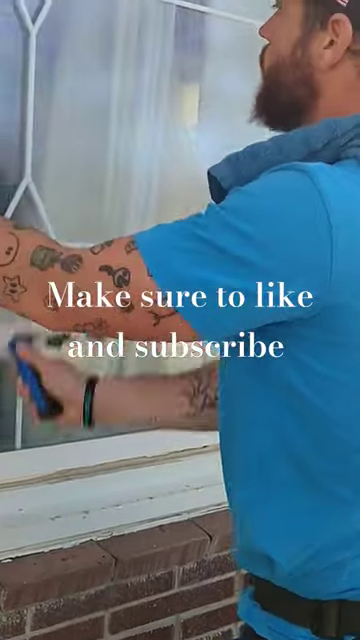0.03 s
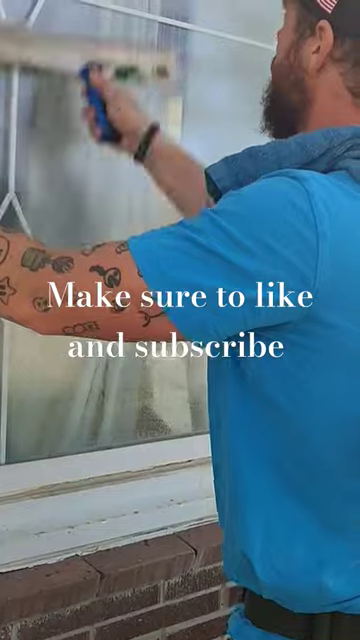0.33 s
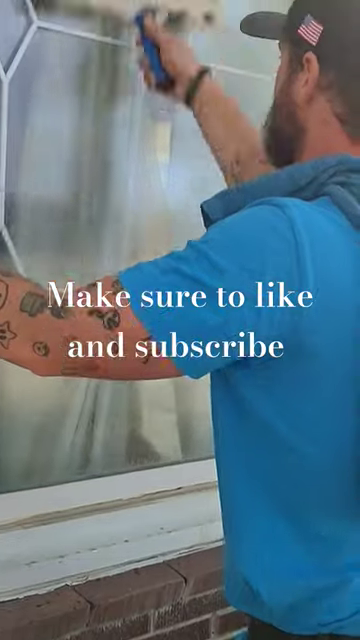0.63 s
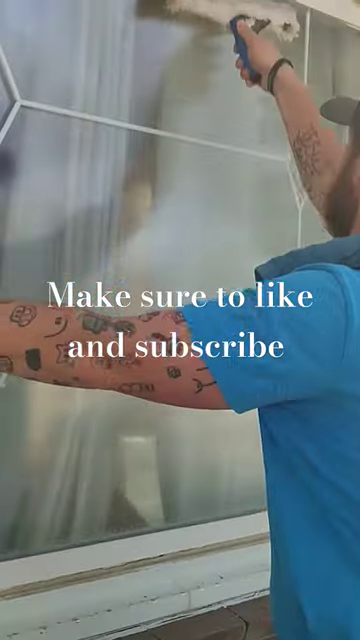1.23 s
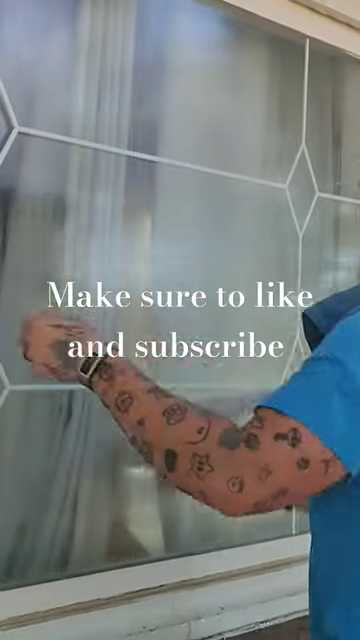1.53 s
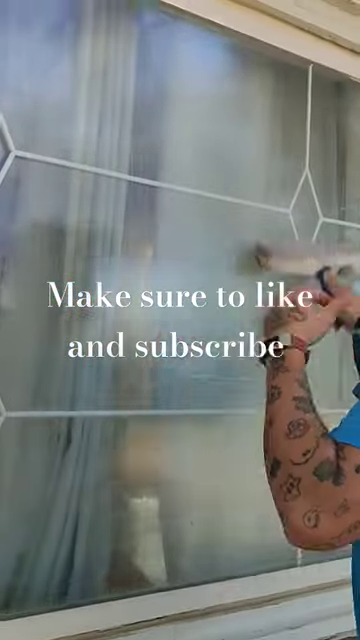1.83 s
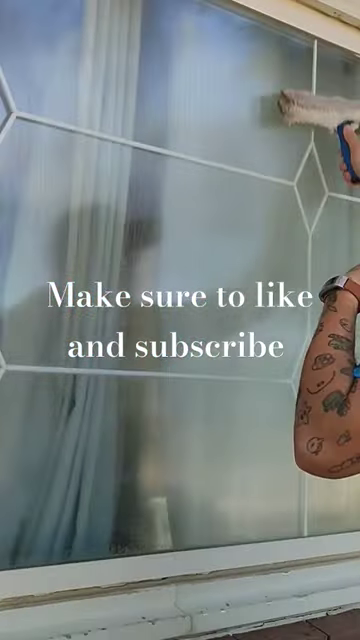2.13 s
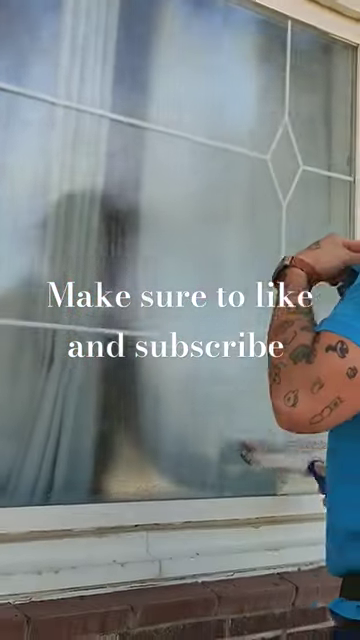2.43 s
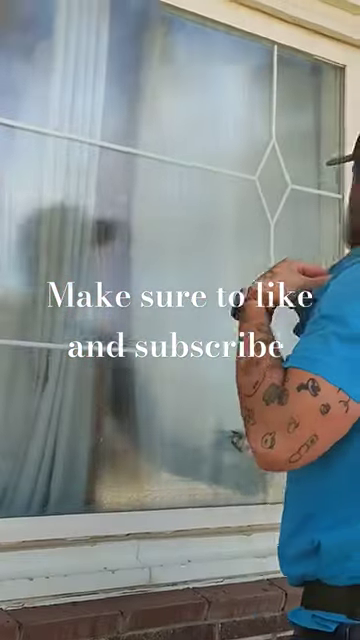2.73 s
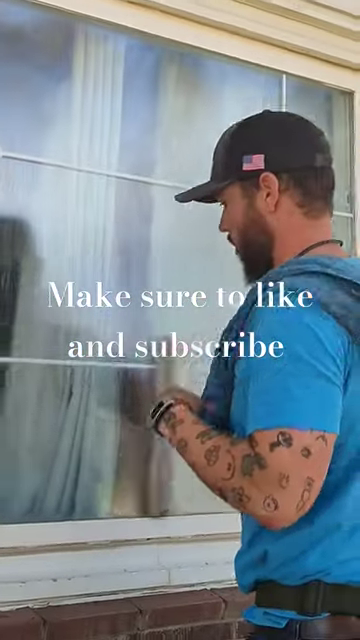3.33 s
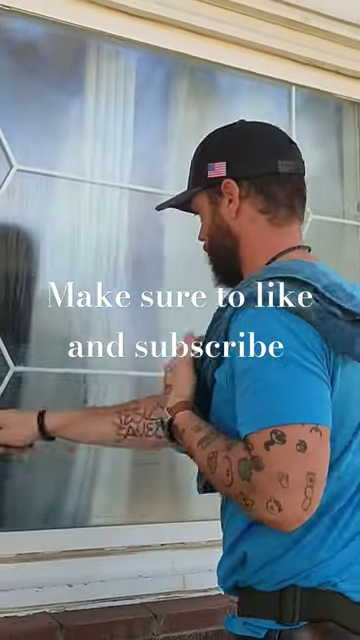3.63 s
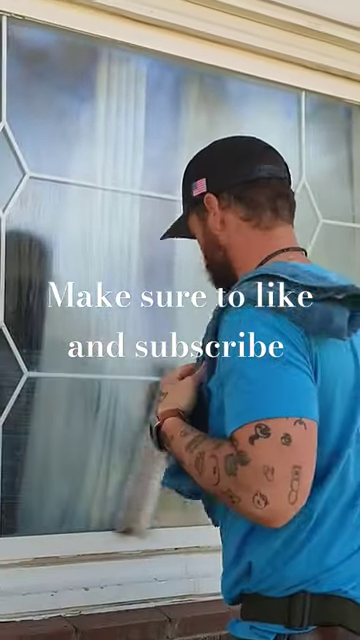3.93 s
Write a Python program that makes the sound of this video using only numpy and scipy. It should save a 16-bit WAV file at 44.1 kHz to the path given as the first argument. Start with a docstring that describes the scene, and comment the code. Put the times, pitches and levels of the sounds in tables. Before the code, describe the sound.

A wet applicator rubs a large window close by, a faint hiss at first, then two clusters of short scuffs and tool ticks. Light wind rumbles unevenly on the microphone over soft outdoor hiss.

```python
"""A wet sleeve hisses over a large window pane outdoors, a step or two away, in a light buffeting wind.
The hiss is the applicator's dense friction on the glass, with a brief squeak as the stroke turns.
Cloth fibres catch in short scuffs, the tool ticks and knocks, and one soft bump makes the pane boom.
Wind rumbles and flutters on the two microphone ports in turn, over soft outdoor hiss and far traffic."""
import sys
import numpy as np
from scipy import signal
from scipy.fft import rfft, irfft
from scipy.io import wavfile
from scipy.ndimage import uniform_filter1d

SR = 44100
rng = np.random.default_rng(int(sys.argv[2]) if len(sys.argv) > 2 else 0)


def persist_wave(psi):
    """Save psi, clipped to +-1, as 16-bit WAV."""
    counts = np.round(np.clip(psi, -1, 1) * 32767).astype(np.int16)
    wavfile.write(sys.argv[1], SR, np.atleast_2d(counts).T)


N = 176400

# The ringing body of the tool. Each row: pitch in Hz, relative level in dB, t60 in seconds.
TOOL_MODES = [(636, -24, 0.021), (1035, 3, 0.011), (1810, -4, 0.034), (2110, 9.5, 0.012),
              (2310, -12, 0.046), (2460, 2, 0.0054), (3070, 1, 0.011)]


def sleeve():
    """The wet sleeve hisses in dense tiny slips on the glass, with a thin singing band that sags."""
    # The strokes. Each row: time in seconds, hiss level in dB.
    strokes = [(0, -64.5), (1.25, -71.5), (1.36, -62), (1.45, -70), (1.7, -61.5), (1.83, -55),
               (2.02, -55.5), (2.11, -53.5), (2.23, -59), (2.36, -53), (2.47, -64.5), (2.6, -70),
               (3.3, -71.5), (3.6, -65), (4, -73)]
    # The tone of wet sleeve on glass. Each row: frequency in Hz, relative level in dB.
    wet_tone = [(150, -15), (400, 0), (800, -4.5), (1200, -4.5), (1800, -1.5), (2600, -1), (3000, -4),
                (3300, -7), (3900, -3.5), (4400, -2), (5200, -2.5), (6200, -5.5), (7200, -12), (9000, -13),
                (15000, -21)]
    # The swell of the singing band. Each row: time in seconds, level in dB.
    singing = [(1.5, -92), (1.68, -70), (1.8, -60), (1.92, -63.5), (2.05, -68), (2.2, -63), (2.33, -64),
               (2.45, -82)]
    slips = grains(per_s=7100, spread_db=2.5)
    hiss = unit(colour(slips, wet_tone)) * amp(curve(strokes))
    start_hz, sag_hz_per_s = 3025, 420
    hz = start_hz - sag_hz_per_s * (clock() - singing[0][0])
    sing = unit(resonate(rng.standard_normal((2, N)), hz, width_hz=490)) * amp(curve(singing))
    return (hiss + sing) * pan(-5)


def squeaks():
    """As the stroke turns, the sleeve sticks and slips on the glass, sounding a few narrow resonances."""
    # Each row: peak time, rise and fall in seconds, level in dB, left over right in dB.
    catches = [(1.958, 0.017, 0.021, -56, -19.5), (1.982, 0.0038, .002, -49, -18)]
    # The squeak's resonances. Each row: centre in Hz, width in Hz, relative level in dB.
    resonances = [(950, 200, -15), (2080, 220, 4), (2240, 220, 5), (2570, 400, 5), (3580, 580, -6)]
    slips = rng.standard_normal((2, N))
    tone = sum(amp(db) * unit(resonate(slips, hz, width)) for hz, width, db in resonances)
    effort = sum(swell(peak, rise, fall) * amp(db) * pan(pan_db)
                 for peak, rise, fall, db, pan_db in catches)
    return steadied(tone, size=200) * effort


def scuffs():
    """Cloth fibres catch and let go in short, bright bursts."""
    # Each row: peak time, rise and fall in seconds, level in dB, treble tilt in dB per octave,
    # left over right in dB.
    brushes = [(1.805, 0.03, 0.057, -56.5, 9, 4), (1.972, 0.039, 0.019, -50, 1, 3),
               (2.298, 0.035, 0.026, -52.5, 0.5, -2), (2.372, 0.044, 0.039, -48.5, -2, -1),
               (3.092, 0.0057, 0.032, -62, -8, -11), (3.645, .025, 0.024, -57, 5, 0),
               (3.695, 0.024, 0.024, -42, -0.5, 0), (3.752, 0.013, 0.0072, -51, 10, -1),
               (3.775, 0.023, 0.03, -44.5, -2, -4), (3.935, 0.024, 0.027, -56.5, -1.5, -3),
               (3.992, 0.013, .02, -58, 3, -4)]
    # The tone of the cloth. Each row: frequency in Hz, relative level in dB.
    cloth_tone = [(200, -39), (700, -7), (1100, -6), (1700, -0.5), (2600, -1.5), (4300, 0.5), (5500, 2),
                  (6400, 3), (7400, 1), (9500, 1), (11200, -2), (12100, 0), (13500, -0.5), (14700, -1),
                  (15500, -13)]
    slips = steadied(grains(per_s=3600, spread_db=2), size=500)
    out = np.zeros((2, N))
    for peak, rise, fall, db, tilt_db, pan_db in brushes:
        rustle = unit(colour(slips, tilted(cloth_tone, tilt_db)))
        out += rustle * swell(peak, rise, fall) * amp(db) * pan(pan_db)
    return out


def ticks():
    """Ticks of the tool and snaps of cloth: brief cracks that set the tool ringing."""
    # Each row: start in seconds, level in dB, decay in seconds, ring relative to the crack in dB,
    # treble tilt in dB per octave, left over right in dB.
    snaps = [(1.784, -44, .001, -25, 11, 16), (1.7838, -44, 0.0016, 0, -4, -12.5),
             (1.860, -34.5, 0.0017, -7, 8, -3), (1.977, -51, 0.0016, -13, 4, -8),
             (1.9813, -39.5, .0018, -21, 9, -1), (2.308, -38, 0.0011, -19, 13, 1),
             (2.357, -47, .0015, -14, 14, -2), (2.829, -52, 0.0068, -14, 5, -5),
             (2.880, -56, 0.0024, 0, 2, -6), (3.0869, -41.5, 0.001, -28, 2, -6),
             (3.607, -51, 0.0021, -3, -6, 1), (3.641, -47.5, 0.0017, -8, 2, -3),
             (3.6782, -33.5, 0.0017, -23, 12, -5), (3.6857, -40, 0.0013, -25, 8.5, -21),
             (3.698, -37.5, 0.0028, -13, 7.5, -13), (3.7427, -39, 0.0023, -10, 3, -1),
             (3.7485, -42, .002, -11, 16, -3), (3.766, -39, 0.0014, -13, -2.5, 6),
             (3.936, -60, .0015, -1, 1, -3)]
    # The tone of a crack. Each row: frequency in Hz, relative level in dB.
    crack_tone = [(200, -37), (900, 3.5), (1300, 7), (1800, 8.5), (2700, 4), (4500, -3.5), (6400, 0.5),
                  (9000, -20), (15000, -16)]
    crack, drive = np.zeros((2, 2, N))
    crack_noise, drive_noise = rng.standard_normal((2, 2, N))
    t = np.arange(2048) / SR
    hz = np.fft.rfftfreq(len(t), 1 / SR)
    for start, db, decay, ring_db, tilt_db, pan_db in snaps:
        span = slice(round(start * SR), round(start * SR) + len(t))
        blow = np.exp(-t / decay) * amp(db) * pan(pan_db)
        grit = irfft(rfft(crack_noise[:, span]) * amp(read(tilted(crack_tone, tilt_db), hz)))
        crack[:, span] += blow * steadied(grit, size=40)
        drive[:, span] += blow * amp(ring_db) * drive_noise[:, span]
    return crack + tool_ring(drive)


def tool_ring(drive):
    """The body of the tool answers a blow with short resonances."""
    t = np.arange(3000) / SR
    ring = sum(amp(db - 60 * t / t60) * np.sin(2 * np.pi * hz * t) for hz, db, t60 in TOOL_MODES)
    return signal.oaconvolve(drive, ring[None] / np.linalg.norm(ring))[:, :N]


def knocks():
    """A hard contact rings all the tool's modes at once, as a scrape ends and as it changes hands."""
    # Each row: start in seconds, level in dB, tilt about 2 kHz in dB per octave, left over right in dB.
    contacts = [(1.9782, -48.5, 0, -15.5), (3.0866, -71, -18, -3)]
    out = np.zeros((2, N))
    for start, db, tilt_db, pan_db in contacts:
        t = np.maximum(clock() - start, 0)
        for hz, mode_db, t60 in TOOL_MODES:
            struck_db = db + mode_db + tilt_db * np.log2(hz / 2000)
            out += pan(pan_db) * amp(struck_db - 60 * t / t60) * np.sin(2 * np.pi * hz * t)
    return out


def pane(rise_s=0.0043):
    """A soft bump makes the whole sheet of glass boom, alike at both ports."""
    # The tool meets the pane at the top of a stroke. Each row: start in seconds, level in dB.
    bumps = [(1.383, -34.5)]
    # The modes of the pane. Each row: pitch in Hz, relative level in dB, t60 in seconds.
    glass_modes = [(45.6, -3.5, 0.66), (65.25, 0.5, 1), (119, -13, 0.16), (334, -21.5, 0.33),
                   (434, -18, 0.14), (507, -34, 0.072)]
    out = np.zeros(N)
    for start, db in bumps:
        t = np.maximum(clock() - start, 0)
        boom = sum(amp(level - 60 * t / t60) * np.sin(2 * np.pi * hz * t)
                   for hz, level, t60 in glass_modes)
        out += amp(db) * (1 - np.exp(-t / rise_s)) * boom
    return out


def wall(x, level_db=-11, t60_s=0.03):
    """The house wall and the ground throw back a short scatter of echoes."""
    t = np.arange(SR // 4) / SR
    arrivals = (rng.random((2, len(t))) < 0.1) * (t > 0.003)
    echoes = rng.standard_normal((2, len(t))) * arrivals * amp(-60 * t / t60_s)
    return amp(level_db) * signal.oaconvolve(x, echoes / np.linalg.norm(echoes[0]), axes=1)[:, :N]


def wind():
    """Each microphone port rumbles on its own in uneven puffs, and brighter as the wind rises."""
    # The wind at each port. Each row: time in seconds, strength in dB.
    left_wind = [(0.0, -57), (0.36, -51), (0.45, -48.5), (0.53, -49.5), (0.6, -48), (0.79, -55),
                 (0.86, -46), (1.04, -48.5), (1.12, -45), (1.36, -46.5), (1.52, -42), (1.58, -33.5),
                 (1.67, -38.5), (1.71, -35.5), (1.75, -37), (1.85, -37), (1.93, -52), (2.02, -57.5),
                 (2.2, -41.5), (2.34, -44.5), (2.5, -43), (2.6, -48), (2.76, -45), (2.89, -44.5),
                 (3.08, -45), (3.24, -50), (3.47, -39.5), (3.72, -44), (3.84, -36.5), (3.96, -40.5),
                 (4.0, -43)]
    right_wind = [(0, -66), (.1, -52), (1.32, -59.5), (1.6, -46), (1.84, -51), (1.93, -40.5), (2.02, -52),
                  (2.2, -38), (2.26, -43), (2.33, -33), (2.41, -35.5), (2.52, -35), (2.6, -42), (2.74, -38),
                  (2.81, -43.5), (2.94, -40), (3.04, -44), (3.11, -41.5), (3.18, -52.5), (3.39, -44.5),
                  (3.46, -38.5), (3.6, -37), (3.66, -41), (3.74, -44), (3.8, -36.5), (3.94, -31.5),
                  (4, -38)]
    # The tones of slow rumble and faster turbulence. Each row: frequency in Hz, relative level in dB.
    rumble_tone = [(10, -1.5), (22, -5.5), (40, 6), (65, 0), (95, -4.5), (140, -18.5), (250, -55),
                   (600, -95)]
    turbulence_tone = [(50, -14.5), (110, 2.5), (165, 2), (230, -7.5), (290, -17), (380, -19), (600, -34),
                       (1500, -47)]
    gust_db, breeze_db, growth = 2, -40.5, 1.92
    wind_db = np.array([curve(port) + gust_db * wander(hz=20.4) for port in (left_wind, right_wind)])
    turbulence_db = -51.5 + growth * (wind_db - breeze_db)
    slow, fast = rng.standard_normal((2, 2, N))
    rumble = steadied(colour(slow, rumble_tone), size=2600) * amp(wind_db + 0.5)
    turbulence = steadied(colour(fast, turbulence_tone), size=2000) * amp(turbulence_db)
    return rumble + turbulence


def eddies(overtone_db=-15):
    """Passing eddies shake a port for a few uneven, lopsided cycles."""
    # Each row: centre and length in seconds, level in dB, flutter in Hz, side from 0 left to 1 right.
    puffs = [(0.449, .07, -46.5, 114.8, .05), (0.589, 0.044, -40.5, 104.6, 0.05),
             (0.691, 0.034, -43, 71.5, .05), (0.869, 0.041, -45.5, 86, 0.055), (.925, .05, -45, 94.7, .05),
             (1.12, 0.044, -35.5, 97, 0.036), (1.296, 0.04, -42, 138, 0.045),
             (1.478, 0.052, -37.5, 101.6, 0.091), (1.56, 0.023, -36, 146, .03),
             (1.579, 0.088, -28.5, 71.7, .05), (1.598, .03, -38.5, 164, .04),
             (1.637, .08, -30.5, 69.9, .05), (1.663, .035, -35.5, 182, 0.036),
             (1.737, 0.027, -24.5, 94.7, .03), (1.83, 0.11, -41.5, 126, 0.14),
             (2.174, 0.026, -39, 200, 0.99), (2.303, 0.041, -28.5, 60, 0.98),
             (2.342, 0.023, -29.5, 141, .97), (2.372, 0.049, -25, 111.5, 0.98),
             (2.405, .025, -40.5, 169, 0.8), (2.431, 0.032, -25.5, 138.4, 1),
             (2.485, 0.051, -20, 126, 0.94), (2.505, .05, -35.5, 51.5, .1),
             (2.633, 0.041, -33.5, 98.7, 0.91), (2.723, 0.062, -43, 94.8, .9),
             (3.25, 0.032, -34, 57.6, 0.95), (3.454, 0.041, -41, 103, 0.92),
             (3.582, .05, -40.5, 107.3, 0.75), (3.633, 0.046, -39.5, 60, 0.044),
             (3.778, 0.0215, -20, 135, 1), (3.856, .06, -23.5, 151.6, 1), (3.898, 0.035, -31.5, 131, 1),
             (3.952, 0.058, -28.5, 100, 1)]
    waver = np.exp(0.2 * wander(hz=127))
    out = np.zeros((2, N))
    for centre, length, db, hz, side in puffs:
        passage = (clock() - centre) / length
        on = abs(passage) < 0.5
        phase = 2 * np.pi * (np.cumsum(hz * waver[on]) / SR + rng.random())
        flutter = np.cos(phase) + amp(overtone_db) * np.cos(2 * phase)
        envelope = np.sqrt(2) * amp(db) * np.cos(np.pi * passage[on]) ** 1.62
        ports = np.array([[np.cos(side * np.pi / 2)], [np.sin(side * np.pi / 2)]])
        out[:, on] += ports * envelope * flutter
    return out


def air(level_db=-58, coder_mottle_db=1.45):
    """Soft, steady outdoor hiss; a faint digital-compression mottle lies over it."""
    # The tone of the hiss. Each row: frequency in Hz, relative level in dB.
    air_tone = [(20, 13.8), (120, 11.96), (200, 7), (280, 3.7), (400, 4.3), (620, 1), (850, 2), (1150, -1),
                (2500, -1.5), (4500, -3), (7000, -3), (9500, -6), (15000, -9)]
    # How alike left and right are. Each row: frequency in Hz, likeness from 0 to 1.
    likeness = [(100, 0.39), (300, 1), (800, 0.13), (1400, 0.011), (15000, 0.016)]
    hz = np.fft.rfftfreq(1024, 1 / SR)
    noise = rng.standard_normal((5, N // 256 + 5, len(hz)))
    left, apart = noise[0] + 1j * noise[1], noise[2] + 1j * noise[3]
    same = read(likeness, hz)
    right = same * left + np.sqrt(1 - same ** 2) * apart
    slow_noise = uniform_filter1d(noise[4], size=12, axis=0)
    coder_mottle = unit(uniform_filter1d(slow_noise, size=40, axis=1))
    spectra = np.array([left, right]) * amp(read(air_tone, hz) + coder_mottle_db * coder_mottle)
    hiss = signal.istft(spectra.transpose(0, 2, 1), nperseg=1024, noverlap=768)[1][:, :N]
    return unit(hiss) * amp(level_db) * pan(-2)


def traffic(spread=0.86, fade_db_per_s=0.5):
    """Far tyres and engines blur into two soft bands of noise that slowly fade."""
    # Each row: centre in Hz, width in Hz, opening level in dB.
    bands = [(339, 46, -77.5), (896, 194, -74)]
    roar = rng.standard_normal(N) + spread * rng.standard_normal((2, N))
    drone = sum(amp(db) * unit(resonate(roar, hz, width)) for hz, width, db in bands)
    return drone * amp(-fade_db_per_s * clock())


def grains(per_s, spread_db):
    """Tiny slips of uneven size, scattered differently on their way to each port."""
    slips = (rng.random(N) < per_s / SR) * amp(spread_db * np.minimum(rng.exponential(1, N), 4))
    envelope = np.sqrt(abs(uniform_filter1d(slips ** 2, size=12)))
    return unit(envelope * rng.standard_normal((2, N)))


def swell(peak, rise, fall):
    """Envelope of one brush: quick growth to a peak, then a fall."""
    t = clock() - peak
    return np.exp(-np.minimum(abs(t / np.where(t < 0, rise, fall)), 20) ** 1.64)


def resonate(x, hz, width_hz):
    """A resonance of gain one whose pitch can glide."""
    turn = np.exp(2j * np.pi * np.cumsum(hz * np.ones(N)) / SR)
    pole = np.exp(-np.pi * width_hz / SR)
    return 2 * (turn * signal.lfilter([(1 - pole) ** 2], [1, -2 * pole, pole ** 2], x / turn)).real


def wander(hz):
    """Smooth random motion that rolls off above hz."""
    rolloff = np.exp(-(np.fft.rfftfreq(N, 1 / SR) / hz) ** 2)
    return unit(irfft(rfft(rng.standard_normal(N)) * rolloff, N))


def steadied(x, size):
    """Evens out a noise's swings slower than about size samples."""
    return x / np.sqrt(uniform_filter1d(uniform_filter1d(x ** 2, size), size) + 1e-12)


def colour(x, points):
    """Equalises by (Hz, dB) points."""
    return irfft(rfft(x) * amp(read(points, np.fft.rfftfreq(N, 1 / SR))), N)


def tilted(points, db_per_octave):
    """A spectrum made brighter or duller."""
    return [(hz, level + db_per_octave * np.log2(hz)) for hz, level in points]


def read(points, hz):
    """Straight lines through (Hz, value) points on a log axis."""
    point_hz, value = np.transpose(points)
    return np.interp(np.log(hz + 1), np.log(point_hz + 1), value)


def curve(points):
    """Straight lines through (seconds, value) points."""
    return np.interp(clock(), *np.transpose(points))


def clock():
    """Time of every sample in seconds."""
    return np.arange(N) / SR


def pan(db):
    """Left and right gains, with the left louder by db."""
    return amp(np.array([[db], [-db]]) / 2)


def amp(db):
    """Decibels to gain."""
    return 10 ** (np.asarray(db) / 20)


def unit(x):
    """Scales to an rms of one."""
    return x / np.sqrt(np.mean(x ** 2) + 1e-20)


def scene():
    """The work at the window, its scatter, the wind and the open air."""
    work = sleeve() + squeaks() + scuffs() + ticks() + knocks()
    return work + wall(work) + wind() + eddies() + pane() + traffic() + air()


def record(dry, edge_hz=15500):
    """Each microphone port colours the treble, and a steep low-pass takes off the very top."""
    # The tone of each port. Each row: frequency in Hz, gain in dB.
    left_port = [(500, -1), (3700, -3), (4400, -5.5), (6200, -6.5), (7800, 1.5), (8500, -1.5), (9400, -5),
                 (12000, -3.5), (15000, -8.5)]
    right_port = [(500, -2), (3300, -3.5), (4400, -3), (6000, -1.5), (7100, 4), (7800, -0.5), (8600, -5),
                  (10500, -4), (12300, -6), (15000, -8.5)]
    heard = np.array([colour(dry[0], left_port), colour(dry[1], right_port)])
    lowpass = signal.firwin(511, edge_hz, window=("kaiser", 9), fs=SR)
    return signal.oaconvolve(heard, lowpass[None], "same")


dry = scene()
out = record(dry)
persist_wave(out)
```